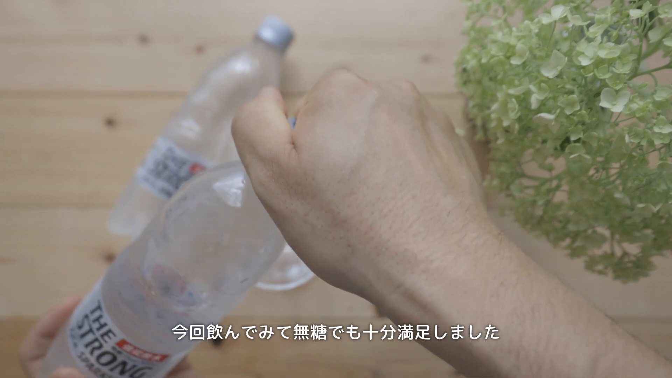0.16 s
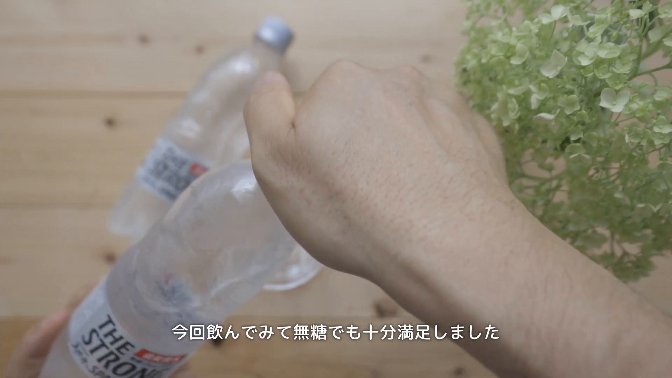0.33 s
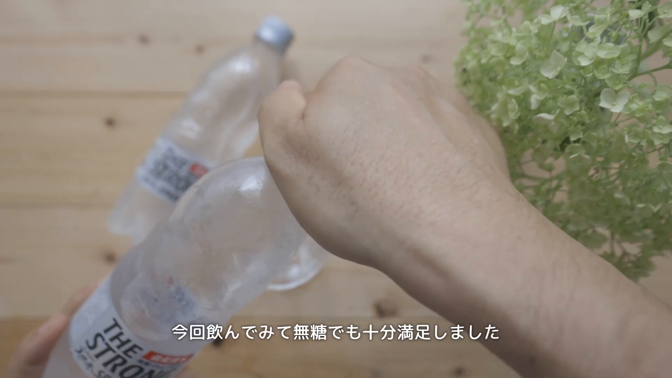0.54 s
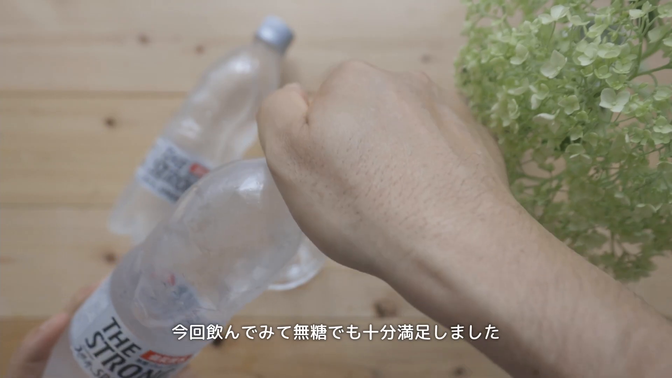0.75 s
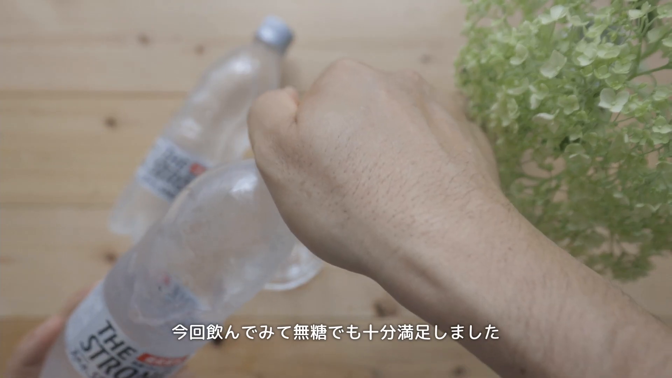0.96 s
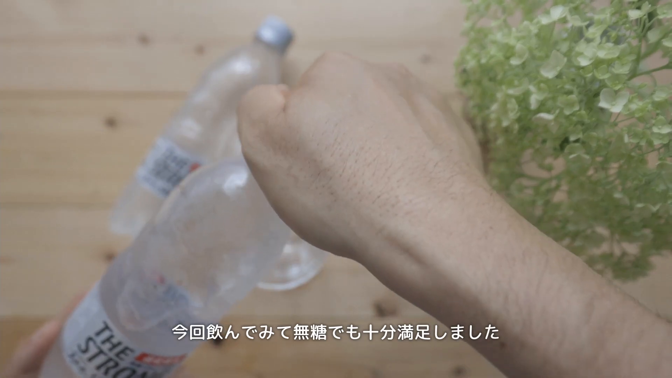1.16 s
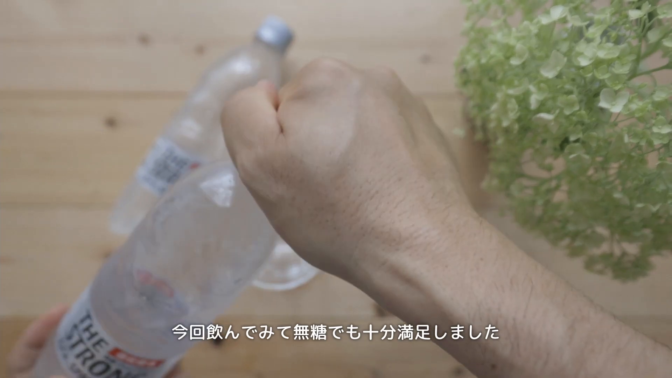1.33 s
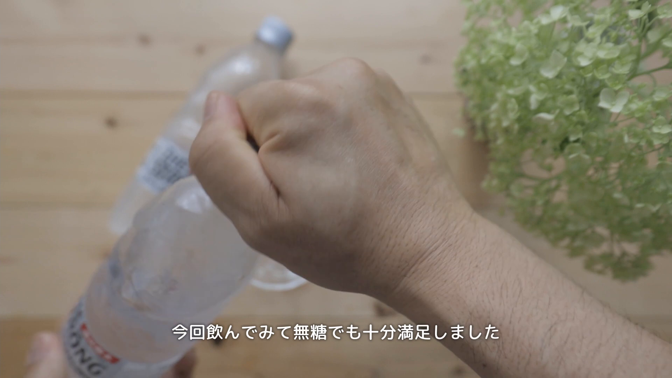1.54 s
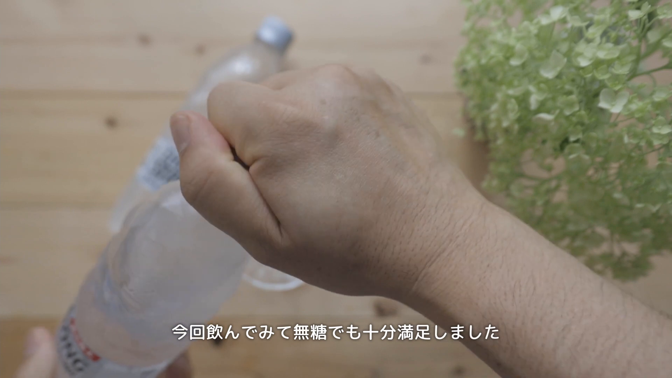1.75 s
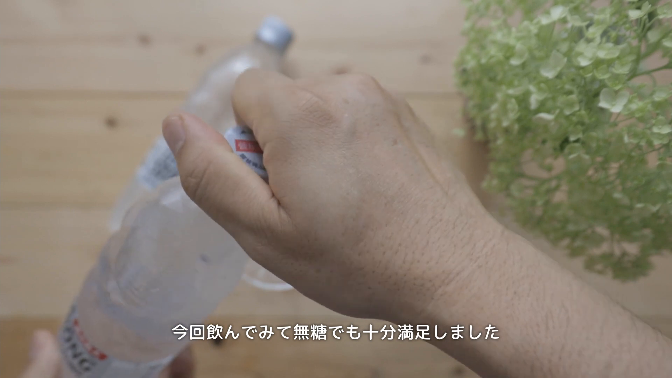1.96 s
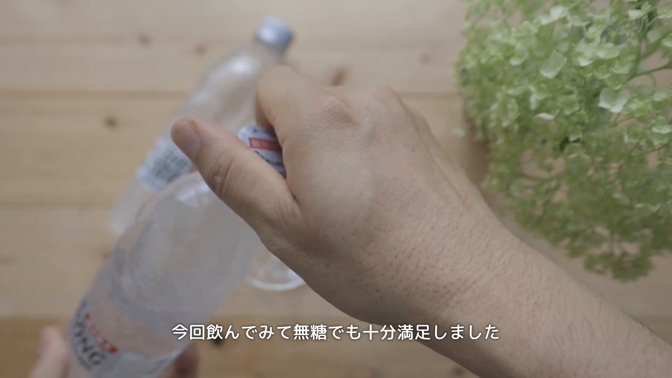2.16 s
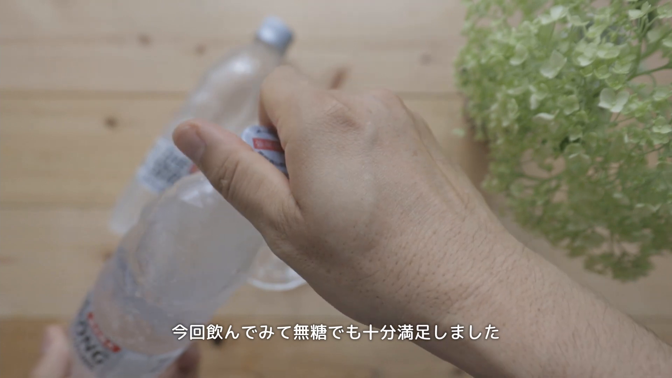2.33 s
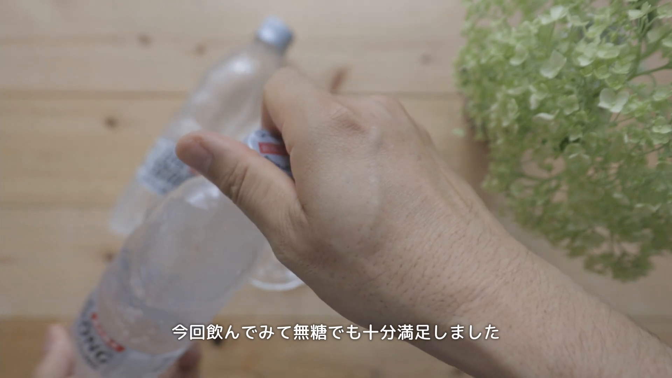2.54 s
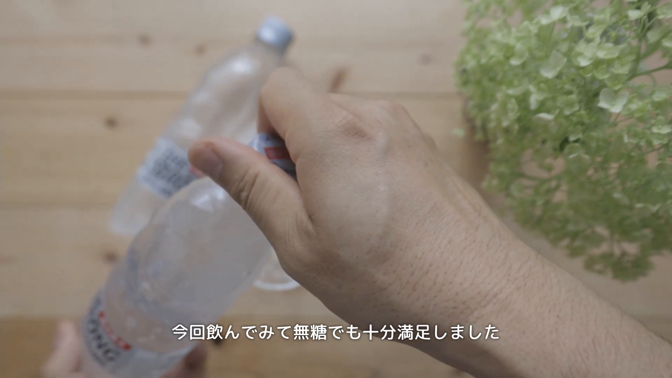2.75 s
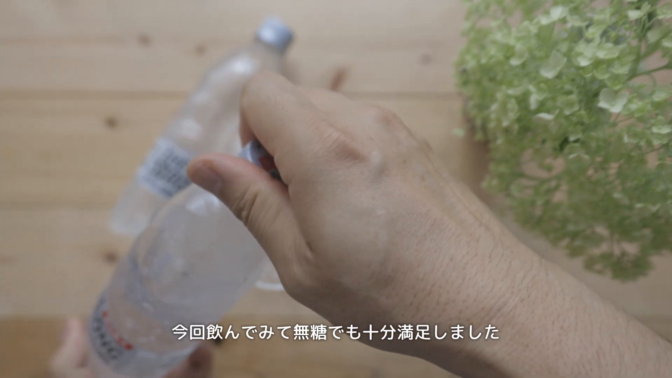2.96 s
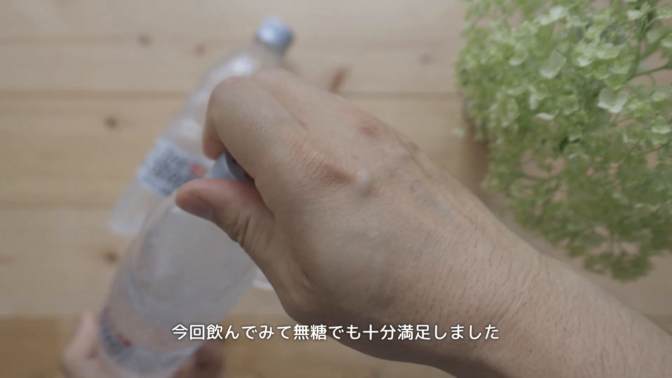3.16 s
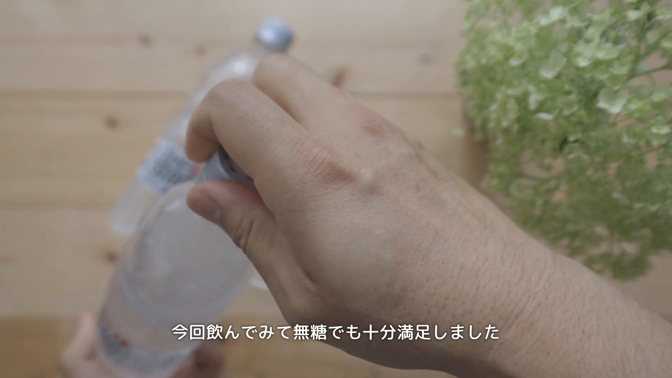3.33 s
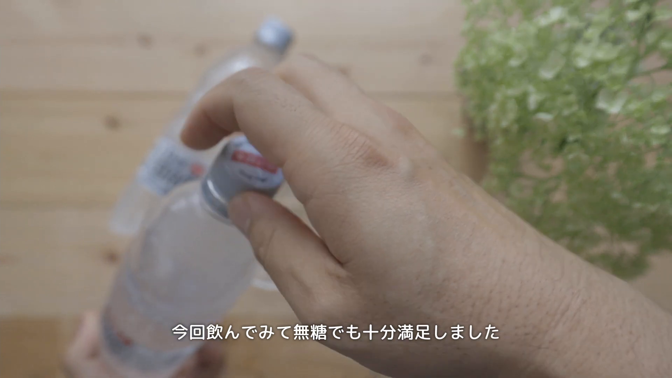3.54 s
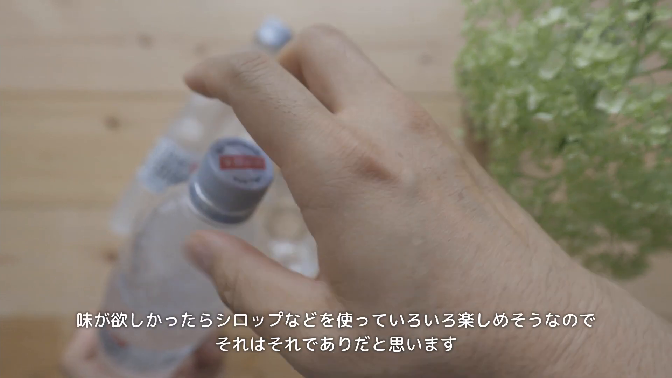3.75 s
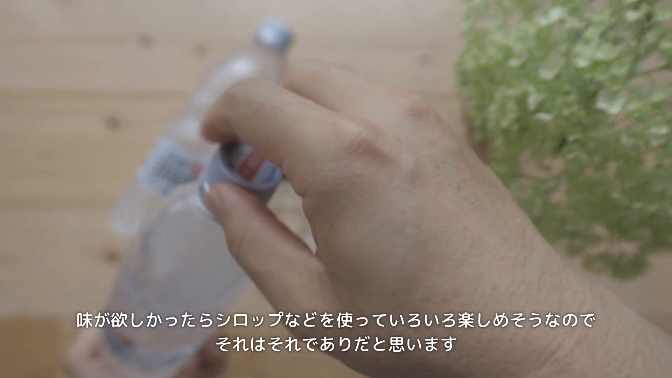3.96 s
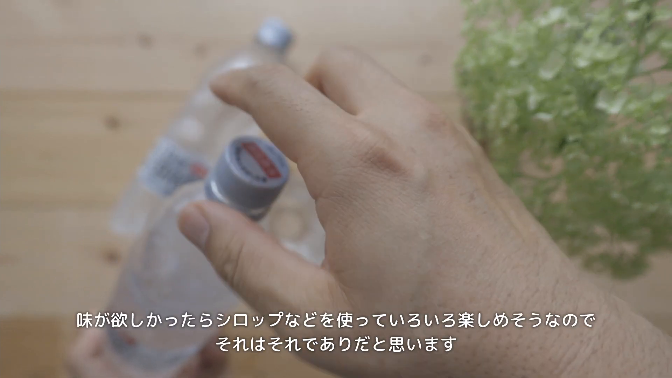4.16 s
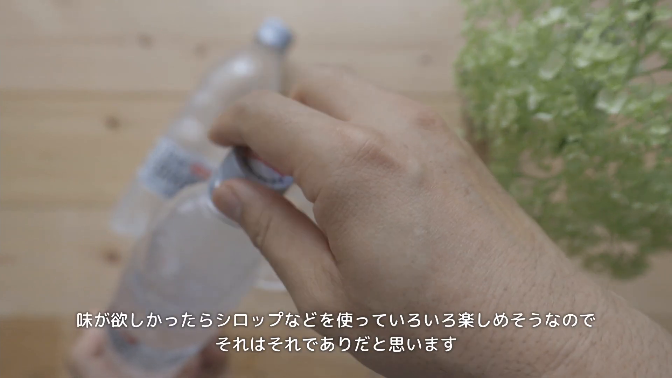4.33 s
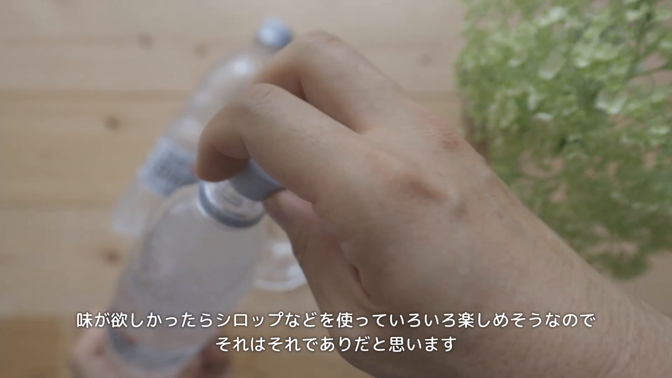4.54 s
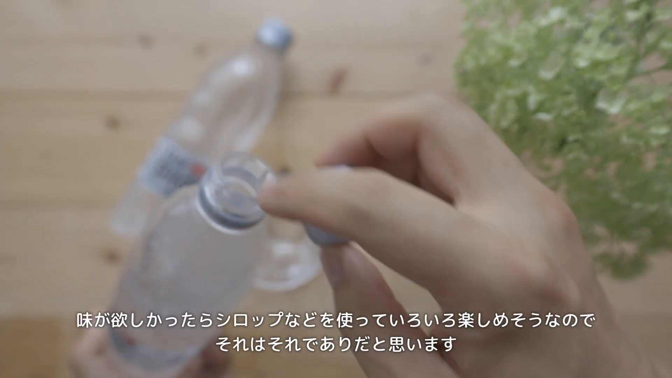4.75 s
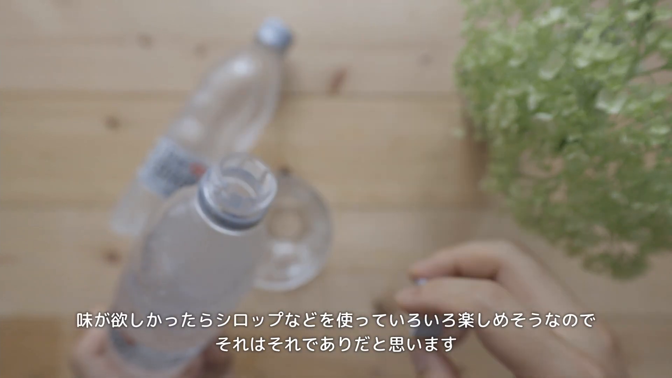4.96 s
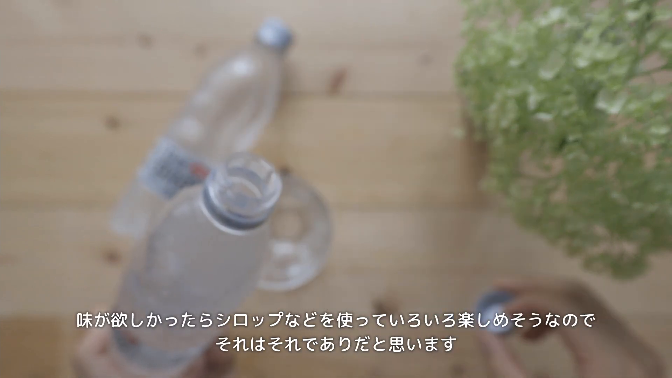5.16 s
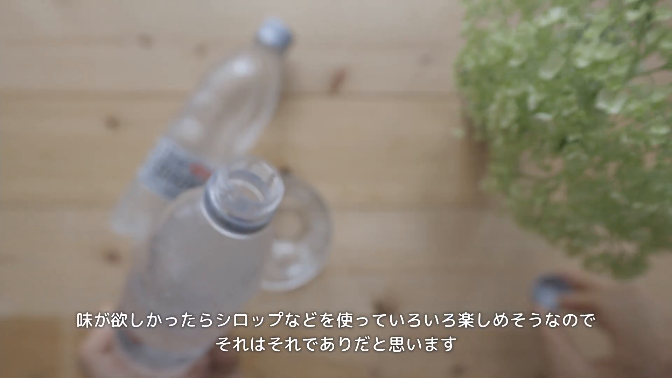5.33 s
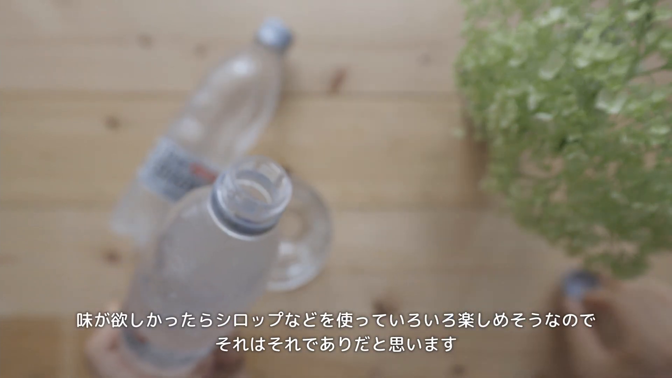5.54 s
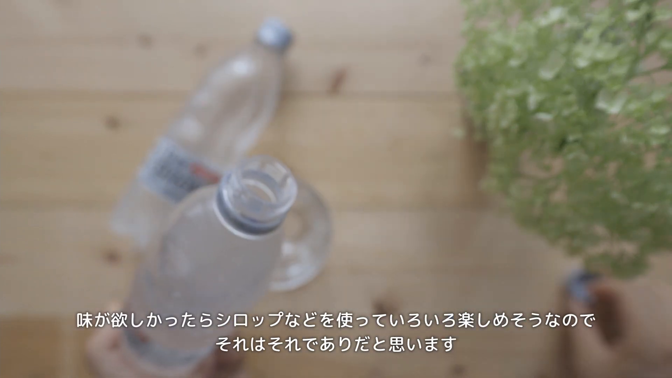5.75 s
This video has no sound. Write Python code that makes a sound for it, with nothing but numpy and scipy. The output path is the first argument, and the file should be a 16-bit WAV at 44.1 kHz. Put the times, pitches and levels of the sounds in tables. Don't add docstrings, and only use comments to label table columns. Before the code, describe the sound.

Close stereo camera microphones in a quiet indoor room with low hum and faint hiss. A fizzy water bottle leaks, then releases a brief, strong hiss of gas. Faint camera focus knocks and ticks follow, then a sharp plastic seal crack. The loose cap rattles on the thread, rubs in the fingers, clips the mouth, and is finally set on the table, with tiny bubble pops.

```python
import sys
import numpy as np
from scipy import signal
from scipy.fft import rfft, irfft
from scipy.io import wavfile
from scipy.ndimage import uniform_filter1d

SR = 44100
rng = np.random.default_rng(int(sys.argv[2]) if len(sys.argv) > 2 else 0)


def persist_wave(psi):
    counts = np.round(np.clip(psi, -1, 1) * 32767).astype(np.int16)
    wavfile.write(sys.argv[1], SR, np.atleast_2d(counts).T)


def linear_from_db(decibels):
    return 10 ** (np.asarray(decibels, float) / 20)


N = 255780


def evened(x):
    return x / np.sqrt(np.mean(x ** 2) + 1e-20)


def read(points, hz):
    f, value = np.transpose(points)
    return np.interp(np.log(hz + 1), np.log(f + 1), value)


def add(mix, start_s, sound, pan_db=-4.5):
    part = mix[:, round(start_s * SR):][:, :sound.shape[-1]]
    sides = linear_from_db(np.array([[.5], [-.5]]) * pan_db)
    part += (sound * sides)[:, :part.shape[1]]


def two_ports(left, other, same, hz):
    like = np.clip(read(same, hz), -1, 1)
    return np.array([left, like * left + np.sqrt(1 - like ** 2) * other])


def hiss(length, colour, same, tilt, patchy_db=0., slope_db=None):
    frames = length // 128 + 5
    hz = np.fft.rfftfreq(512, 1 / SR)[:, None]
    a, b, c, d, patches = rng.standard_normal((frames, 257, 5)).T
    patches = uniform_filter1d(patches, size=4, axis=0)
    patches = evened(uniform_filter1d(patches, size=14, axis=1))
    z = two_ports(a + 1j * b, c + 1j * d, same, hz)
    sides = np.array([.5, -.5])[:, None, None]
    db = read(colour, hz) + patchy_db * patches + sides * read(tilt, hz)
    if slope_db is not None:
        at = np.minimum(np.arange(frames) * 128, length - 1)
        db = db + np.log2((hz + 500) / 6000) * slope_db[at]
    return evened(signal.istft(z * linear_from_db(db), nperseg=512, noverlap=384)[1][:, :length])


def resonate(x, modes):
    total = 0
    for hz, width, db in modes:
        b, a = signal.iirpeak(hz, hz / (width * np.pi / 2), SR)
        total = total + linear_from_db(db) * signal.lfilter(b, a, signal.lfilter(b, a, x))
    return total


def ring(modes, length=4000):
    t = np.arange(length) / SR
    x = 0
    for hz, t60, db in modes:
        x = x + linear_from_db(db - 60 * t / t60) * np.sin(2 * np.pi * hz * rng.uniform(0.9, 1.1) * t)
    return x / abs(x).max()


def burst(decay, length=3000):
    return rng.standard_normal(length) * linear_from_db(-60 * np.arange(length) / SR / max(decay, .001))


def bright(x, hz=5000):
    return signal.sosfilt(signal.butter(2, hz, "high", fs=SR, output="sos"), x)


def band(x, low_hz, high_hz):
    return signal.sosfilt(signal.butter(2, [low_hz, high_hz], "band", fs=SR, output="sos"), x)


def gritty(length):
    clumps = evened(uniform_filter1d(rng.standard_normal(length), size=60))
    return rng.standard_normal(length) * linear_from_db(3.6 * clumps)


def played(rows):
    s, *columns = np.transpose(rows)
    t = np.arange(s[0], s[-1], 1 / SR)
    return s[0], signal.windows.tukey(len(t), .1), [np.interp(t, s, c) for c in columns]


# pitch_hz, level_db (per Hz)
ROOM_TONE = [(15, -39.5), (25, -8.5), (65, -12), (86, -8.5), (103, 0), (128, -2), (167, -8.5), (249, -13.5),
             (393, -13), (602, -14.5), (1000, -15.5), (1900, -25.5), (2120, -25), (14900, -35)]
# pitch_hz, likeness (-1 to 1)
ROOM_TONE_LIKENESS = [(60, 0.86), (180, 0.83), (550, 0.25), (1650, 0.68), (4970, 0.7), (15000, 0.91)]
# pitch_hz, left_minus_right_db
ROOM_TONE_BALANCE = [(60, -0.62), (240, -0.63), (950, -1.0), (3770, -0.62), (15000, 0.0)]
ROOM_TONE_DB = -62


def air():
    hz = np.fft.rfftfreq(N, 1 / SR)
    left, other = rfft(rng.standard_normal((N, 2)).T)
    z = two_ports(left, other, ROOM_TONE_LIKENESS, hz)
    sides = np.array([[.5], [-.5]])
    z *= linear_from_db(read(ROOM_TONE, hz) + sides * read(ROOM_TONE_BALANCE, hz))
    return linear_from_db(ROOM_TONE_DB + 1.0) * evened(irfft(z, N))


# start_s, peak_db
REVERSALS = [(0.865, -55), (0.889, -51), (0.92, -50), (0.937, -42), (2.527, -47), (2.584, -48.5),
             (2.664, -50), (2.746, -47), (2.839, -46.5), (2.869, -54.5), (2.962, -48), (2.997, -47.5),
             (3.099, -47), (3.134, -44), (3.209, -50), (3.262, -48.5), (3.304, -50.5), (3.351, -48.5),
             (3.42, -47), (3.473, -48), (3.514, -51), (3.556, -50), (3.637, -38)]
# pitch_hz, t60_s, level_db
LOW_RING_MODES = [(94.8, 0.078, 14), (110.6, 0.035, -5)]
# centre_hz, width_hz, level_db
BARREL_MODES = [(311, 80, 1), (530, 92, 1.5), (725, 95, 4.5)]
# pitch_hz, t60_s, level_db
PAWL_MODES = [(1980, 0.022, 16), (2600, 0.02, 10)]
STEP_FRAMES = [0, 39, 41, 43, 45, 47, 48, 50, 51, 53, 54, 57, 57.6, 58, 59, 60, 62, 64]
# peak_s, level_db, whirr_hz
SURGES = [
    (3.578, -60.5, 2800),
    (3.627, -57, 2910),
    (3.668, -60.5, 2630),
]
FIRST_STEP_S, FRAMES_PER_S = .859, 23.976
TICK_DB, TICK_SPREAD_DB = -58.5, 1.2
RATTLE_DB, RATTLE_GROWTH = -51, 0.53
SURGE_S = .06


def focus(mix):
    t = np.arange(4000) / SR
    for s, db in REVERSALS:
        jolt = np.sin(2 * np.pi * 420 * t) * (1 - np.exp(-t / 0.00037)) * linear_from_db(-60 * t / 0.0087) * 3.7
        gears = rng.standard_normal(len(t)) * np.exp(-(t / 0.02) ** 4)
        rattle = resonate(gears, BARREL_MODES)
        rattle = 0.24 * rattle / rattle[:700].std()
        swell = (1 - np.exp(-t / 0.0094)) * np.exp(-(t / 0.046) ** 4)
        low_ring = -ring(LOW_RING_MODES) * swell * 1.76
        rattle_db = RATTLE_DB + RATTLE_GROWTH * (db - RATTLE_DB)
        add(mix, s, linear_from_db(db) * (low_ring + 0.33 * jolt) + linear_from_db(rattle_db) * rattle)
    for frame in STEP_FRAMES:
        click = band(burst(0.0048, length=4000), 1200, 2400)
        tick = 1.37 * ring(PAWL_MODES) + 0.61 * click / abs(click).max()
        tick_db = TICK_DB + TICK_SPREAD_DB * rng.standard_normal()
        add(mix, FIRST_STEP_S + frame / FRAMES_PER_S, linear_from_db(tick_db) * tick)
    length = round(SURGE_S * SR)
    for s, db, hz in SURGES:
        low = signal.butter(2, 500, fs=SR, output="sos")
        slow = signal.sosfilt(low, rng.standard_normal((2, length)))
        turn = 2 * np.pi * hz * np.arange(length) / SR
        whine = evened(slow[0] * np.cos(turn) + slow[1] * np.sin(turn))
        scrape = evened(band(gritty(length), 447, 2500))
        whirr = 0.46 * whine + 0.85 * scrape
        add(mix, s - SURGE_S / 2, np.hanning(length) * linear_from_db(db) * whirr)


# start_s, jet_db
MAIN_BURST = [
    (1.538, -66),
    (1.551, -40),
    (1.563, -43.5),
    (1.566, -27),
    (1.605, -15.5),
    (1.691, -15.5),
    (1.733, -21.5),
    (1.748, -32.5),
    (1.791, -44),
]
# start_s, length_s, jet_db, held_share (0-1), brightness_db (per octave)
LEAKS = [
    (1.441, 0.24, -69.5, 0.63, -8),
    (1.739, 0.19, -42, 0.34, -0.5),
    (2.609, 0.32, -70, 0.4, -1),
]
# pitch_hz, level_db (per Hz)
JET_COLOUR = [(590, -45), (1000, -19.5), (2590, -11), (4000, -7), (5600, -3.5), (8600, -4), (11600, -10.5),
              (15000, -12)]
# pitch_hz, level_db (per Hz)
RUSH_COLOUR = [(71, -24.5), (120, -7), (342, -6), (851, -3), (927, -9.5), (1030, -6), (2200, -4.5),
               (2860, -36), (4840, -120)]
# pitch_hz, likeness (-1 to 1)
GAS_LIKENESS = [(60, 0.04), (150, 0.47), (380, 0.023), (950, 0.34), (2380, 1), (5980, 0.94), (15000, 0.12)]
# pitch_hz, left_minus_right_db
GAS_BALANCE = [(60, -8), (180, -0.5), (550, -3), (1650, -2), (4970, -2), (15000, -2.0)]
# centre_hz, width_hz, level_db
CAP_AIR = [(2610, 130, 0), (5950, 400, 1.5), (7800, 400, -1)]
TOP_DB, TOP_SLOPE_DB, DULLING = -18.5, 3.5, 0.27
LEAK_RISE_S, LEAK_FALL_DB = .035, -27
CAVITY_DB, CAVITY_MAX_DB = -4.5, -35
RUSH_DB = -34
GUST_S, GUST_DB, GUST_FALL_DB_PER_S = 1.64, -22, 223.5
THREAD_ECHO = 122
NARROW_S, NARROW_SPAN_S, NARROW_ECHO = 1.607, .03, .85


def gas(mix):
    flows = [[(s, db, TOP_SLOPE_DB + DULLING * (db - TOP_DB)) for s, db in MAIN_BURST]]
    for s, length, db, held, slope_db in LEAKS:
        flows.append([(s, db - 12.5, slope_db),
                      (s + LEAK_RISE_S, db, slope_db),
                      (s + held * length, db, slope_db),
                      (s + length, db + LEAK_FALL_DB, slope_db)])
    for rows in flows:
        s, fade, (jet_db, slope_db) = played(rows)
        t = s + np.arange(len(fade)) / SR
        jet = hiss(len(t), JET_COLOUR, GAS_LIKENESS, GAS_BALANCE, 3.5, slope_db)
        narrow = NARROW_ECHO * np.exp(-((t - NARROW_S) / NARROW_SPAN_S) ** 4)
        turns = [narrow ** k * np.roll(jet, shift=k * THREAD_ECHO, axis=1) for k in range(5)]
        jet = sum(turns) * np.sqrt(1 - narrow ** 2)
        cavity = evened(resonate(rng.standard_normal(len(t)), CAP_AIR))
        cavity = linear_from_db(np.minimum(jet_db + CAVITY_DB, CAVITY_MAX_DB)) * cavity
        gust = linear_from_db(GUST_DB - GUST_FALL_DB_PER_S * abs(t - GUST_S))
        rush = (gust + linear_from_db(RUSH_DB)) * hiss(len(t), RUSH_COLOUR, GAS_LIKENESS, GAS_BALANCE, 3.6)
        add(mix, s, fade * (linear_from_db(jet_db) * (jet + rush) + cavity), 0)


# left_ms, right_ms, level_db
NEAR_ECHOES = [(.76, .68, -16.5), (1.1, 1.25, -16.5), (1.45, 1.4, -22.5), (1.85, 2.16, -12)]


def near(x):
    taps = np.zeros((2, 128))
    taps[:, 0] = 1
    for left_ms, right_ms, db in NEAR_ECHOES:
        delay = np.array([[left_ms], [right_ms]]) * SR / 1000
        taps += linear_from_db(db) * np.sinc(np.arange(128) - delay)
    taps = taps.mean(0) + bright(taps - taps.mean(0), 4000)
    return signal.oaconvolve(x, taps / np.linalg.norm(taps[0]), axes=1)[:, :N]


# pitch_hz, t60_s
ROOM_DECAY = [(300, 0.24), (1500, 0.23), (4000, 0.15), (10000, 0.082), (14500, 0.12)]
ROOM_DB = -13.5


def room(x):
    taps = np.zeros((2, SR // 2))
    slots = np.arange(200, SR // 2 - 20, 20)
    at = slots[None] + rng.integers(0, 20, (2, len(slots)))
    np.put_along_axis(taps, at, rng.choice([-1., 1.], at.shape), 1)
    hz, t, z = signal.stft(taps, SR, nperseg=256)
    decay = linear_from_db(-60 * t / read(ROOM_DECAY, hz)[:, None])
    tail = signal.istft(z * decay, SR, nperseg=256)[1]
    tail = tail + 0.23 * tail[::-1]
    return signal.fftconvolve(x.mean(0)[None], tail / np.linalg.norm(tail[0]), axes=1)[:, :N]


# start_s, peak_db, decay_s
SEAL_CRACKS = [
    (3.1418, -30, 0.00586),
    (3.1438, -10.5, 0.0035),
    (3.1452, -15, 0.018),
    (3.151, -33, 0.018),
    (3.16, -43, 0.06),
    (3.168, -40, 0.13),
]
# centre_hz, width_hz, level_db (over the bare crack)
NECK_MODES = [(420, 120, 3), (930, 170, 6), (1710, 150, 8), (2250, 250, 2), (2900, 220, 2), (3500, 250, 13),
              (4800, 250, 4), (5900, 500, 1), (7900, 300, 7), (14100, 350, 5), (14780, 250, 9)]
RING_FADE_DB_PER_S = 9000


def seal(mix):
    main_s = SEAL_CRACKS[1][0]
    for s, db, decay in SEAL_CRACKS:
        blow = 6 * linear_from_db(-RING_FADE_DB_PER_S * abs(s - main_s)) * signal.unit_impulse(3000)
        sound = band(burst(decay), 800, 11500) + resonate(blow, NECK_MODES)
        add(mix, s, linear_from_db(db) * sound / abs(sound).max(), -.8)


def plastic(drive, modes, edge_db):
    edges = band(band(drive, 2800, 10500), 2000, 12000)
    return evened(resonate(drive, modes)) + linear_from_db(edge_db) * evened(edges)


# start_s, peak_db, edge_brightness_db
THREAD_KNOCKS = [(3.415, -48, -6), (3.5995, -44.5, -15), (3.672, -54, -14), (3.977, -50, -23),
                 (4.0052, -38, -23.5), (4.0105, -41, -9), (4.0315, -39.5, -25), (4.0555, -43, 2),
                 (4.0695, -32, -11), (4.08, -33.5, -8), (4.083, -30.5, -8), (4.089, -39, -27),
                 (4.0975, -45, -25)]
FINGER_KNOCKS = [(4.344, -36, -30.5), (4.351, -49, -23), (4.385, -45.5, -21), (4.402, -54, -19.5),
                 (4.427, -47, -22), (4.461, -45.5, -23)]
LIFT_KNOCKS = [
    (4.5393, -38.5, -15),
    (4.5425, -43.5, -8),
    (4.5612, -41, -18),
    (4.564, -49, -6),
]
TABLE_KNOCKS = [
    (5.6951, -34, -20),
    (5.6966, -33, -20),
    (5.7, -39, -20),
]
REBOUND_KNOCKS = [
    (5.708, -41, -30),
    (5.71, -38.5, -19),
    (5.737, -53, -22),
    (5.742, -52, -17),
    (5.763, -58, 1),
]
# centre_hz, width_hz, level_db
THREAD_MODES = [(360, 163, 5.5), (1010, 520, 7), (1950, 480, 8), (2390, 390, 6), (2825, 65, 5),
                (3460, 110, 4.5), (5000, 890, -3), (9300, 320, -21), (14500, 798, -14)]
FINGER_MODES = [(392, 97, 9.5), (740, 750, 7.5), (2300, 320, 5), (3370, 200, -20), (1430, 194, 9),
                (1830, 410, 8.5), (2879, 330, 6), (4100, 150, -20.5), (5230, 1100, -6)]
MOUTH_MODES = [(410, 97, 5.5), (515, 41, 5), (970, 173, -2), (1950, 190, -1), (2430, 180, -1),
               (3117, 83, -5)]
TABLE_MODES = [(565, 200, -5), (1230, 195, -3), (1906, 404, 3), (2250, 330, 1), (2890, 190, 2),
               (3800, 280, 5.5), (4550, 410, -1), (5400, 650, -8)]
ROCKING_MODES = [(563, 200, 1), (813, 75, 1), (1284, 160, 3), (1940, 230, -2.5), (3000, 370, -9.5),
                 (7800, 330, -15)]
# decay_s, left_minus_right_db
GRIP_CONTACT = [
    (.026, -2),
    (0.012, -1),
    (0.022, -2.5),
    (0.0094, 3),
    (0.022, 0),
]
# start_s, peak_s, end_s, peak_db, edge_brightness_db
RUB_STROKES = [
    (3.961, 4.085, 4.13, -52, -14),
    (4.343, 4.44, 4.59, -59.5, -11.5),
    (5.697, 5.711, 5.8, -57.5, -7.5),
]
RUB_START_DB, RUB_END_DB = -18.5, -17


def cap(mix):
    grips = [(THREAD_KNOCKS, THREAD_MODES), (FINGER_KNOCKS, FINGER_MODES), (LIFT_KNOCKS, MOUTH_MODES),
             (TABLE_KNOCKS, TABLE_MODES), (REBOUND_KNOCKS, ROCKING_MODES)]
    for (knocks, modes), (decay, pan_db) in zip(grips, GRIP_CONTACT):
        for s, db, edge_db in knocks:
            drive = burst(decay)
            drive[0] = 0 if modes is THREAD_MODES else 5
            sound = plastic(drive, modes, edge_db)
            add(mix, s, linear_from_db(db) * sound / abs(sound).max(), pan_db)
    rubbed = (THREAD_MODES, FINGER_MODES, ROCKING_MODES)
    for (start, top, end, db, edge_db), modes in zip(RUB_STROKES, rubbed):
        s, fade, (rub_db,) = played([(start, db + RUB_START_DB), (top, db), (end, db + RUB_END_DB)])
        add(mix, s, fade * linear_from_db(rub_db) * plastic(gritty(len(fade)), modes, edge_db))


# start_s, peak_db, pitch_hz
BUBBLE_POPS = [(4.6444, -56, 8300), (4.655, -55, 7520), (4.8773, -54, 13500), (4.8914, -54, 10340),
               (4.8987, -54, 7480), (4.9229, -54, 6065), (5.2144, -59.5, 8380), (5.4644, -55.5, 9880),
               (5.4804, -52.5, 8455), (5.683, -49, 7840), (5.7154, -49, 7500), (5.7344, -62, 7650),
               (5.7564, -56.5, 13900), (5.7644, -60, 9280)]


def bubbles(mix):
    t = np.arange(300) / SR
    for s, db, hz in BUBBLE_POPS:
        chirp = np.sin(2 * np.pi * hz * t * (1 + 40 * t)) * linear_from_db(-60 * t / 0.0046)
        tick = 0.7 * bright(burst(0.006, length=300), 6400)
        add(mix, s, linear_from_db(db) * (chirp + tick), rng.normal(-1, 2.04))


def scene():
    bottle, camera = np.zeros((2, 2, N))
    focus(camera)
    for source in (gas, seal, cap, bubbles):
        source(bottle)
    return near(bottle) + linear_from_db(ROOM_DB) * room(bottle) + camera + air()


def top_cut(x):
    return signal.sosfilt(signal.butter(12, 16380, fs=SR, output="sos"), x)


def record(dry):
    edge = signal.firwin(255, 15050, window=("kaiser", 4), fs=SR)
    limited = signal.oaconvolve(dry, edge[None], "same")
    return top_cut(limited)


dry = scene()
out = record(dry)
persist_wave(out)
```